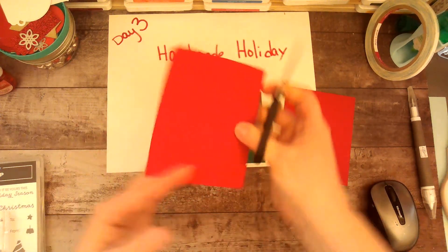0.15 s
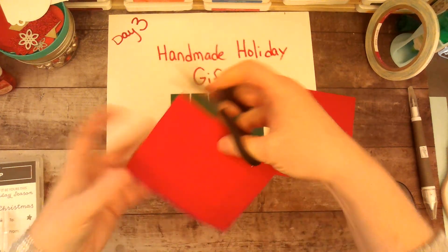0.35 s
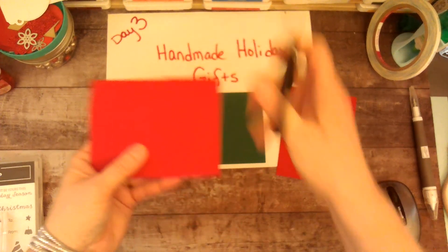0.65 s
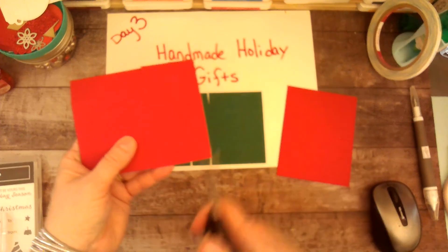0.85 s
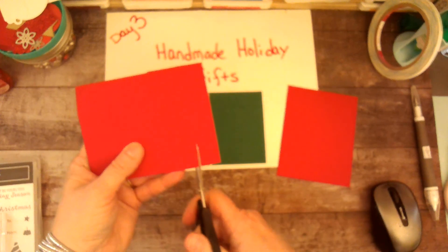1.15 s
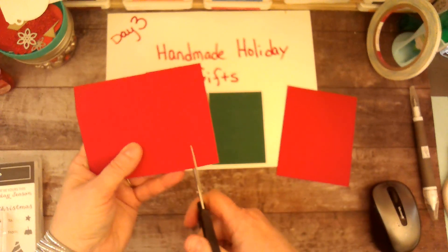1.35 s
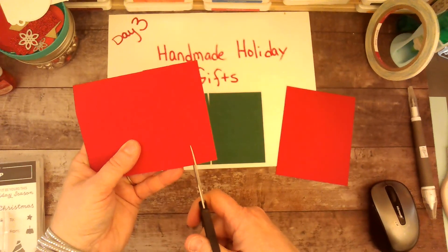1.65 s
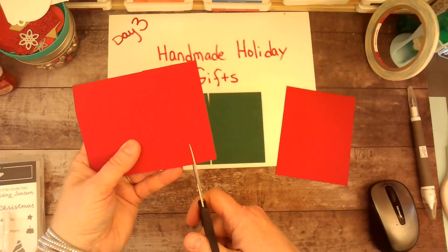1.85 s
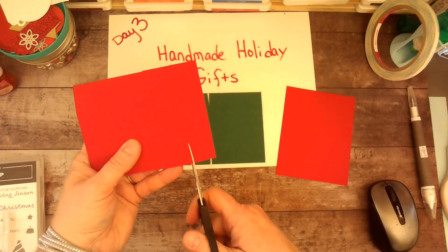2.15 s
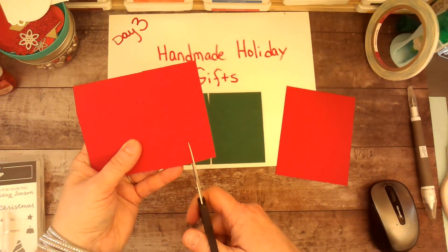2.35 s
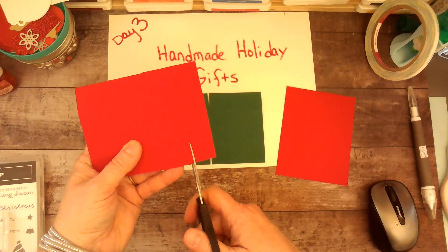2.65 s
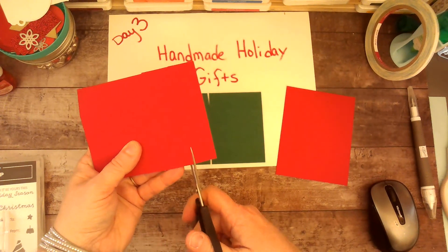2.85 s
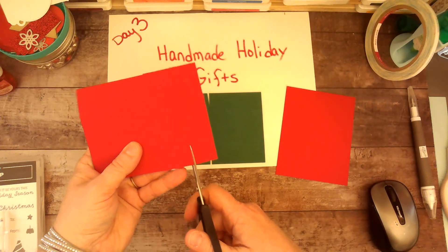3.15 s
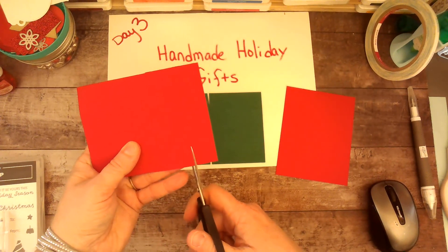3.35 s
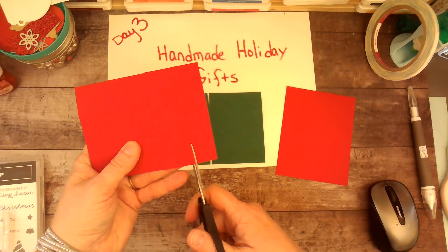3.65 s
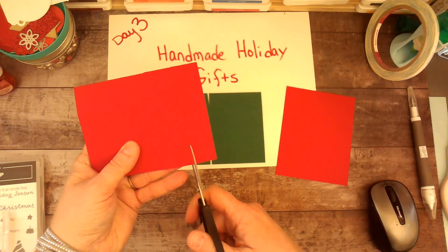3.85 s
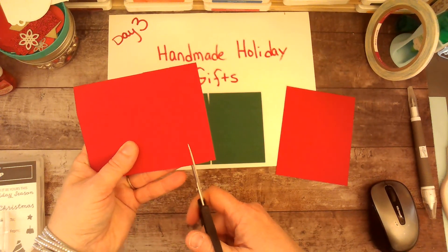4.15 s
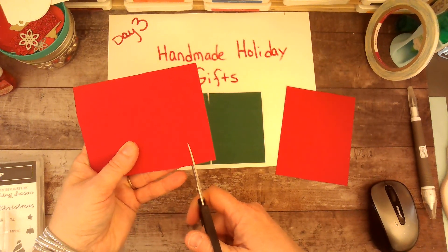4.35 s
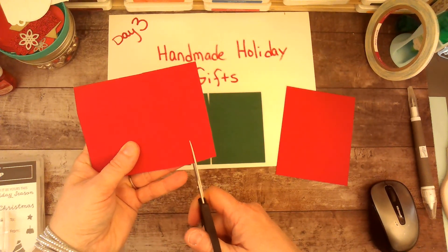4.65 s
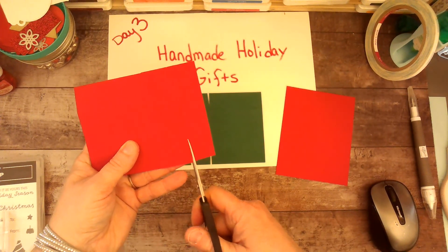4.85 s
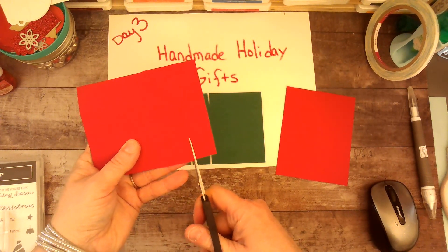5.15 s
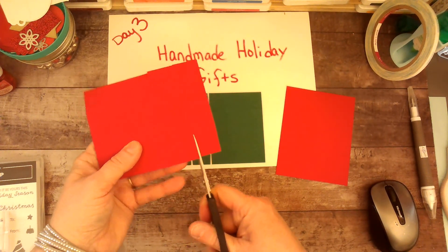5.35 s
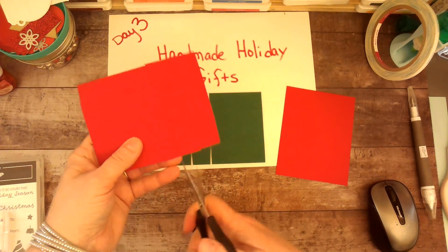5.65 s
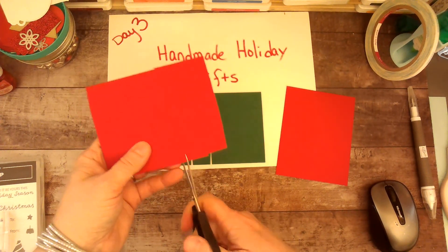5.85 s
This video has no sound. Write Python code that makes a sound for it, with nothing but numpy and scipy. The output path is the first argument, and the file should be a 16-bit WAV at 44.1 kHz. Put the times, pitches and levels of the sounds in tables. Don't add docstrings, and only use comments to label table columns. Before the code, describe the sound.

Stiff card flicked and brushed by fingers, a long quiet pause with faint taps, then scissors creak open, bite through and snap shut loudly.

```python
import sys
import numpy as np
from scipy import signal
from scipy.fft import rfft, irfft, next_fast_len
from scipy.io import wavfile
from scipy.ndimage import map_coordinates

SR = 44100
rng = np.random.default_rng(int(sys.argv[2]) if len(sys.argv) > 2 else 0)


def linear_from_db(decibels):
    return 10 ** (np.asarray(decibels, float) / 20)


def output_pcm(signal):
    pcm = np.clip(np.atleast_2d(signal).T, -1, 1) * 32767
    wavfile.write(sys.argv[1], SR, np.round(pcm).astype(np.int16))


N = 265041

# start in seconds, peak in dB, treble in dB.
SLIPS = [(4.6124, -63, -7), (4.63, -52, -10), (4.649, -45, -6), (4.6828, -52, -10), (4.7084, -36, -9),
         (4.7282, -42, -13), (4.7457, -42, -12), (4.7636, -33, -25), (4.773, -34, -17), (4.782, -30.5, -21),
         (4.794, -45, -18), (4.8187, -37.5, -5), (4.8414, -32.5, -16), (4.8554, -48, -11),
         (4.865, -34, -15), (4.8721, -27.5, -30), (4.8988, -32, -5), (4.9147, -39.5, -12),
         (4.9903, -32, -0.5), (5.0046, -36.5, -10), (5.0138, -39, -14), (5.0562, -36, -11)]
# centre in Hz, width in Hz, level in dB.
BLADES = [(2700, 500, -9), (3200, 300, -8), (3700, 260, 0), (4250, 400, -7), (4980, 150, -7),
          (5240, 200, -7), (6200, 900, -13)]
# centre in Hz, width in Hz, level in dB.
BLADE_LOW = [(1440, 60, -6), (1800, 200, -8), (2078, 70, 0)]
# frequency in Hz, level in dB.
SLIP_EDGE = [(5500, -16), (7000, -4), (9400, -2), (10400, -9), (11500, -19), (13600, -4), (15200, 1),
             (17000, -6)]


def slips():
    rows = []
    for start, db, treble_db in SLIPS:
        low_db = -15.5 + 22.5 * (start - SLIPS[0][0])
        length_ms = 4.4 + 0.2 * (db + 35.5)
        rows.append((start, db, treble_db, low_db, length_ms))
    creak = bursts(rows, BLADES, SLIP_EDGE, BLADE_LOW, rise=0.00025, kick=2.9, low_kick=4.0, lumpy_db=7.0)
    return linear_from_db(-4.5) * creak


# start in seconds, peak in dB, treble in dB,
# card thump in dB, length in ms.
SNAPS = [
    (5.5223, -24, -9, -12, 9.9),
    (5.5262, -23, -22, -18, 2.4),
    (5.5375, -26.5, -8, -14.5, 4.7),
    (5.5397, -10.5, -11, -27, 1.3),
    (5.542, -16.5, -12, -7, 0.79),
    (5.5454, -33, -6, -3.5, 6.6),
    (5.5734, -46, -17, -3, 3.5),
]
# centre in Hz, width in Hz, level in dB.
SHUT = [(1500, 500, -17), (1900, 150, -12), (2230, 130, 0), (2750, 100, -8), (3030, 220, 0), (3730, 220, 1),
        (5080, 300, -2), (5800, 600, -7)]
# centre in Hz, width in Hz, level in dB.
SHUT_LOW = [(197, 110, -10), (307, 45, -2), (375, 39, -1), (464, 61, -6.5), (647, 45, -8), (809, 38, 2.5),
            (1030, 150, -13)]
# frequency in Hz, level in dB.
SHUT_EDGE = [(5800, -26), (7200, 5), (8300, -6), (9400, -0.5), (12300, -16), (14000, -7), (15400, 2),
             (17000, -24)]


def snaps():
    return bursts(SNAPS, SHUT, SHUT_EDGE, SHUT_LOW, rise=0.00027, kick=3.8, low_kick=4.0, lumpy_db=0.0)


# start in seconds, peak in dB, treble in dB,
# card thump in dB, length in ms.
BITES = [
    (5.2859, -38.5, -13, -13, 3.3),
    (5.3012, -15.5, -3, -18.5, 2.1),
]
# centre in Hz, width in Hz, level in dB.
BITE = [(1570, 340, -11), (2020, 90, -4.5), (2920, 140, 4), (3330, 390, 1), (3790, 340, 1.5),
        (5270, 530, -7), (6670, 900, -5.5)]
# centre in Hz, width in Hz, level in dB.
BITE_LOW = [(385, 53, 0), (610, 86, -3), (782, 65, 1.5), (990, 67, -3.5)]
# frequency in Hz, level in dB.
BITE_EDGE = [(5200, -35), (7000, -13), (9300, -8), (10200, -2), (11800, -8), (15000, 0.5), (17000, -13)]


def bites():
    return bursts(BITES, BITE, BITE_EDGE, BITE_LOW, rise=0.0002, kick=5.1, low_kick=10.3, lumpy_db=0.5)


# start in seconds, peak in dB, treble in dB,
# low blade modes in dB, length in ms.
JUMP = [
    (5.0659, -24, -8, -6.5, 3.6),
]


def jump():
    low = BLADE_LOW + [(700, 210, -15.5)]
    return bursts(JUMP, BLADES, BITE_EDGE, low, rise=0.00043, kick=2.2, low_kick=4.6, lumpy_db=5.5)


# start in seconds, length in seconds, level in dB, treble in dB.
GRIND = [(4.58, 0.15, -69, -2), (4.722, 0.044, -61, -4.5), (4.76, 0.047, -59, -2), (4.835, .025, -63, 0),
         (4.865, .028, -63, 1), (4.905, .022, -62, -2), (4.99, 0.031, -66, -7), (5.07, 0.015, -70, -8),
         (5.09, .12, -74, -5)]


def grind():
    return rubbing(GRIND, BLADES, SLIP_EDGE, BLADE_LOW,
                   swell=0.26, t60=0.046, low_db=-8.5, catch_db=2.4, lumpy_db=4)


# start in seconds, peak in dB, treble in dB,
# card thump in dB, length in ms.
FLICKS = [
    (.0343, -42, -10, -18, 2.9),
    (.0764, -42, -8, -14, 2.5),
    (.0862, -37, -16, -16, 3),
    (.196, -37, -15, -16, 4.8),
    (.4432, -25, -6.5, -8, 1.7),
    (.4638, -36, -17, -15, 3.9),
    (.471, -44, -8, -21, 1.5),
    (1.419, -45.5, -9, -10, 4.3),
    (1.7255, -62, -6, -16, 2.5),
    (3.402, -54, 9, -14, 1.5),
]
# centre in Hz, width in Hz, level in dB.
CARD = [(1554, 700, -14), (1910, 350, -3), (2810, 630, -4), (3710, 410, 1), (5110, 420, -4.5),
        (6600, 1000, -9)]
# centre in Hz, width in Hz, level in dB.
THUMP = [(184, 410, -1.5), (361, 69, 14.5), (480, 360, -4.5), (860, 180, -2)]
# frequency in Hz, level in dB.
TREBLE = [(4600, -15), (5600, 4.5), (7200, 2), (8500, -7), (11500, -8), (13500, -4), (15300, 4.5),
          (17000, 1)]


def flicks():
    return bursts(FLICKS, CARD, TREBLE, THUMP, rise=0.0006, kick=2.8, low_kick=12.0, lumpy_db=3.5)


# start in seconds, length in seconds, level in dB, treble in dB.
BRUSH = [(.032, .06, -58, 2), (.105, 0.037, -62, 5), (.13, 0.045, -57, 5), (.215, 0.085, -65.5, -8),
         (.426, .011, -56, -4), (.461, .014, -54, -5), (.472, .032, -47, 1), (.51, 0.055, -60, -9),
         (.555, 0.082, -62, -1), (.65, 0.066, -66.5, 1), (2.98, 0.14, -71, -10), (3.17, .015, -67, -12),
         (5.258, 0.0068, -60, -9), (5.302, 0.013, -60, -9), (5.325, 0.058, -64.5, -12),
         (5.39, 0.049, -61.5, -5), (5.544, .015, -48, -9), (5.565, .04, -63, -16), (5.62, 0.21, -71.5, -15)]


def brush():
    return rubbing(BRUSH, CARD, TREBLE, THUMP,
                   swell=0.33, t60=0.1, low_db=-11.5, catch_db=1.6, lumpy_db=2.8)


# start in seconds, peak in dB, card thump in dB.
TAPS = [
    (3.084, -52, -15),
    (3.1442, -36.5, -5),
    (3.1583, -38, -11),
    (3.1947, -44, -6.5),
    (3.2163, -44, -8),
    (3.2648, -46.5, -5),
    (3.2951, -44.5, -5),
]
# start in seconds, peak in dB, card thump in dB.
SHIFTS = [(1.1134, -53, -10), (1.3194, -57, -9), (1.541, -54.5, 2), (1.56, -56, -6), (1.6651, -57.5, -8),
          (1.894, -56, -6), (2.1905, -60, -4), (2.3688, -57.5, -5), (2.8013, -58, -16), (2.8994, -64, -12),
          (3.0394, -59, -15), (3.384, -60, -2), (3.544, -57, -5), (3.8739, -58, -5), (4.221, -59.5, 1.5)]
# centre in Hz, width in Hz, level in dB.
HANDLES = [(1500, 180, -4), (2000, 200, -2), (2800, 300, -4.5), (3700, 250, -5), (4500, 400, -6),
           (5300, 220, 0)]
# centre in Hz, width in Hz, level in dB.
KNUCKLE = [(150.1, 110, -4.5), (364, 140, 1), (830, 210, -16)]


def grip():
    tap_rows = [(start, db, -6, thump_db, 4.4) for start, db, thump_db in TAPS]
    usual_db = np.mean([row[1] for row in SHIFTS])
    shift_rows = []
    for start, db, thump_db in SHIFTS:
        treble_db = -5 + 1.6 * (db - usual_db)
        shift_rows.append((start, db, treble_db, thump_db, 21.6))
    taps = bursts(tap_rows, HANDLES, TREBLE, KNUCKLE, rise=0.00025, kick=2.6, low_kick=16.3, lumpy_db=2.5)
    shifts = bursts(shift_rows, HANDLES, TREBLE, BITE_LOW, rise=0.00053, kick=.1, low_kick=.1, lumpy_db=4.5)
    return taps + shifts


# first step in seconds, period in seconds, number of steps.
STEPS = [
    (.2588, .0745, 10),
    (.9659, .03726, 19),
    (1.709, 1, 1),
]


def lens_motor():
    at = np.concatenate([first + period * np.arange(count) for first, period, count in STEPS])
    train, t = np.zeros(N), np.arange(-20, 20) / SR
    train[np.round(at * SR).astype(int)] = linear_from_db(-47.5 + 1.2 * rng.standard_normal(len(at)))
    pulse = -np.cos(2 * np.pi * 4000 * t) * np.exp(-(t / 0.00026) ** 2)
    tick = np.convolve(train, pulse, "same")
    return np.roll(tick, 40) + .55 * np.roll(tick, 65)


# frequency in Hz, t60 in seconds.
ROOM = [(300, 0.39), (2000, 0.13), (4500, 0.24), (7000, 0.15), (15000, 0.13)]


def room(x):
    hz, t, z = signal.stft(rng.standard_normal(SR // 2), SR, nperseg=256)
    decay = linear_from_db(-60 * t / along(ROOM, hz)[:, None])
    tail = signal.istft(z * decay, SR, nperseg=256)[1]
    return signal.fftconvolve(np.pad(x, (220, 0)), tail / np.linalg.norm(tail))[:N]


# time in seconds, level in dB.
SWAY = [(.05, -37.5), (.5, -35.5), (.85, -34), (1.05, -43.5), (1.35, -44), (1.75, -36), (2.05, -38.5),
        (2.3, -35.5), (3.5, -36), (4.05, -34), (4.85, -35), (5.05, -42), (5.35, -41), (5.7, -35.5)]


def swing_db():
    return np.interp(np.arange(N) / SR, *np.transpose(SWAY))


def arm_sway():
    hz = 11.5 + 0.42 * wobble(4.017)
    return np.sqrt(2) * linear_from_db(swing_db()) * np.cos(2 * np.pi * np.cumsum(hz) / SR)


# frequency in Hz, density in dB per Hz.
RUMBLE = [(4, -11), (7, -5), (22, -13.5), (32, -18.5), (38, -11.5), (46, -28), (120, -35.5), (500, -70)]


def rumble():
    swing = swing_db()
    level_db = -47 + 0.44 * (swing - swing.mean()) + 1.9 * wobble(11)
    return linear_from_db(level_db) * filtered(rng.standard_normal(N), colour(RUMBLE))


# frequency in Hz, density in dB per Hz.
HISS = [(90, -24), (150, -5.5), (330, -7.5), (640, -13), (3500, -18.5), (13500, -21.5), (15300, -16),
        (16500, -16.5)]


def hiss():
    return linear_from_db(-63.5 + 0.87 * wobble(17)) * filtered(rng.standard_normal(N), colour(HISS))


# frequency in Hz, rms level in dB.
WHINE = [(4160.2, -75.5), (4133, -83)]


def whine():
    t, total = np.arange(N) / SR, np.zeros(N)
    for hz, db in WHINE:
        level = np.sqrt(2) * linear_from_db(db + .6 * wobble(8))
        total += level * np.sin(2 * np.pi * hz * t + .25 * wobble(4))
    return total


def bursts(table, body, edge, low, rise, kick, low_kick, lumpy_db):
    force, t = np.zeros((3, N + SR)), np.arange(SR // 5) / SR
    rough = np.pad(grit(lumpy_db, 1500), (0, SR))
    blow = np.outer([kick, kick, low_kick], np.arange(len(t)) == 8)
    for start, db, treble_db, low_db, ms in table:
        first = round(start * SR)
        shape = (1 - np.exp(-t / rise)) * np.exp(-(t * 1000 / abs(ms)) ** 1.12)
        scrape = shape * rough[first:][:len(t)]
        scrape = scrape * np.linalg.norm(shape) / np.linalg.norm(scrape)
        level = linear_from_db(db - 7.5 + np.array([[0], [treble_db], [low_db]]))
        force[:, first:][:, :len(t)] += level * (scrape + blow)
    return driven(force[:, :N], body, edge, low)


def rubbing(strokes, body, edge, low, swell, t60, low_db, catch_db, lumpy_db):
    t, level, bright = np.arange(N) / SR, np.zeros(N), np.zeros(N)
    for start, length, db, treble_db in strokes:
        onset = np.clip((t - start) / (swell * length), 0, 1)
        shape = onset * linear_from_db(db - 60 * np.clip(t - start - length, 0, 1) / t60)
        level += shape
        bright += shape * linear_from_db(treble_db)
    force = linear_from_db(catch_db * wobble(120)) * grit(lumpy_db, 900)
    return driven([force * level, force * bright, force * level * linear_from_db(low_db)], body, edge, low)


def driven(forces, body, edge, low):
    ringing = filtered(forces[0], modes(body))
    brightness = filtered(forces[1], colour(edge))
    return ringing + brightness + filtered(forces[2], modes(low))


def grit(lumpy_db, grain_rate):
    x = rng.standard_normal(N) * linear_from_db(lumpy_db * wobble(grain_rate))
    return x / np.sqrt(np.mean(x ** 2) + 1e-20)


def wobble(rate):
    knots = rng.standard_normal(int(N * rate / SR) + 4)
    return map_coordinates(knots, [np.arange(N) * rate / SR])


def modes(table):
    def response(f):
        total = 0
        for k, (centre, width, db) in enumerate(table):
            damping = 1j * f * width
            total = total + (-1) ** k * linear_from_db(db) * damping / (centre * centre - f * f + damping)
        return total
    return response


def colour(points):
    return lambda f: linear_from_db(along(points, f))


def along(points, hz):
    f, v = np.transpose(points)
    return np.interp(np.log(hz + 1), np.log(f + 1), v)


def filtered(x, response):
    m = next_fast_len(N + SR // 2)
    gain = response(np.fft.rfftfreq(m, 1 / SR))
    return irfft(rfft(x, m) * gain / np.sqrt(np.mean(abs(gain) ** 2)), m)[:N]


def below(x, top_hz, slope_hz):
    gain = np.clip((top_hz - np.fft.rfftfreq(N, 1 / SR)) / slope_hz, 0, 1) ** 2
    return irfft(rfft(x) * gain, N)


def scene():
    sharp = bites() + snaps() + jump()
    near = slips() + grind() + flicks() + brush() + grip() + lens_motor()
    background = arm_sway() + rumble() + hiss() + whine()
    steady = near + linear_from_db(-15) * room(near + sharp) + background
    return (below(sharp, 17000, 900) + below(steady, 15970, 100))[None]


def band_limit(x):
    return signal.sosfilt(signal.butter(12, 16890, fs=SR, output="sos"), x)


def record(dry):
    return band_limit(dry)


dry = scene()
out = record(dry)
output_pcm(out)
```